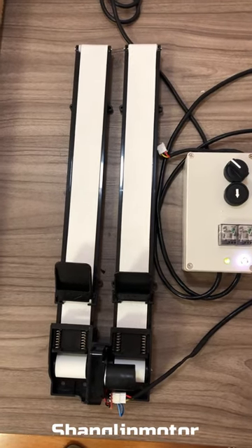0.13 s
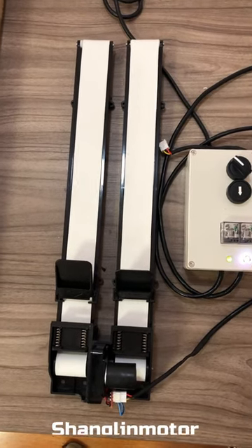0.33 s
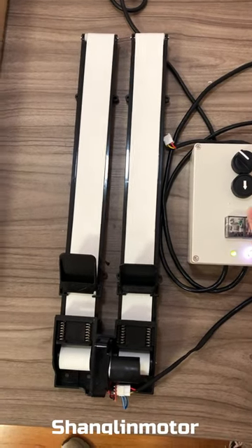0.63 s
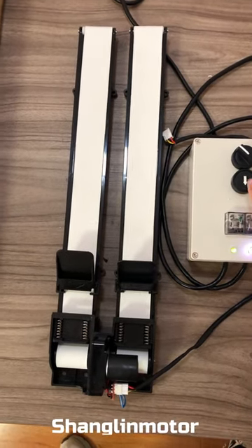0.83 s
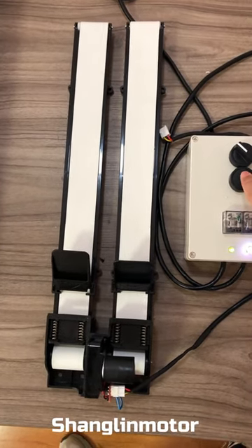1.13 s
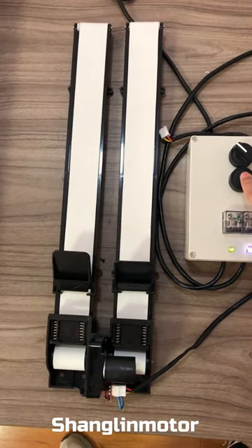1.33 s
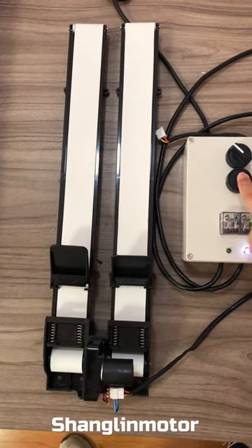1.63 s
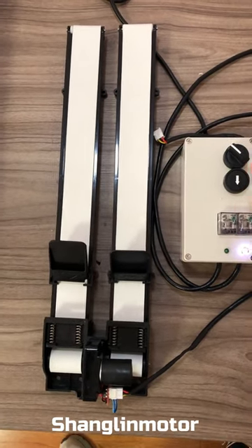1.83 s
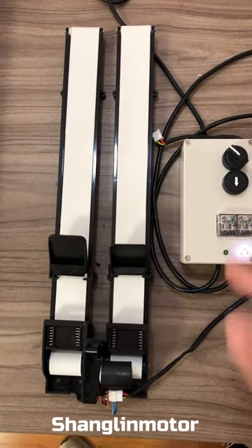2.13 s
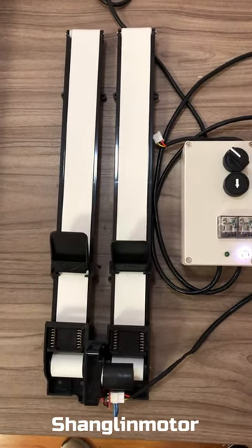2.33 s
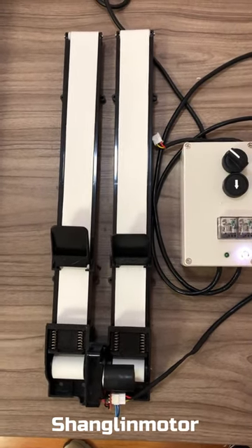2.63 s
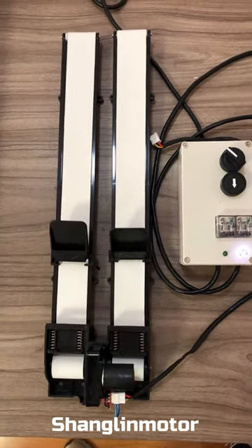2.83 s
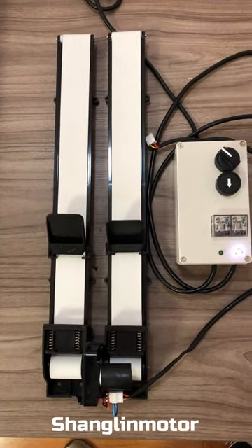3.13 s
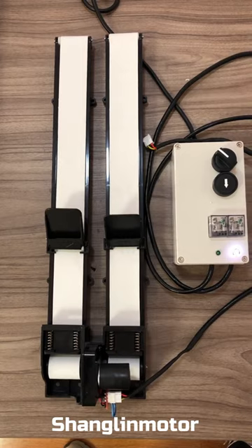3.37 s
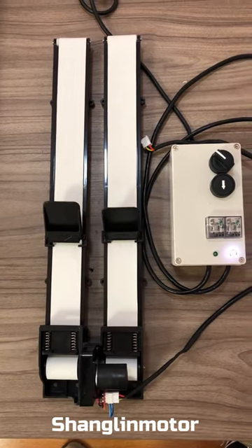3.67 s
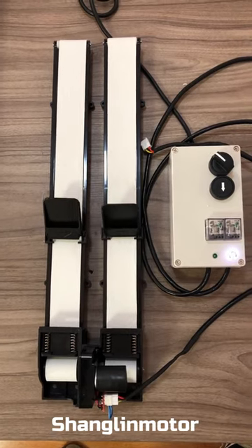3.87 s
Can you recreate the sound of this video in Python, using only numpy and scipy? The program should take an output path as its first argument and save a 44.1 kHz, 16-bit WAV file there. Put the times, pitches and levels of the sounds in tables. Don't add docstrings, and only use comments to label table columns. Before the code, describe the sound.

Quiet indoor room with a faint distant tap, then a switch snaps and a small electric gear motor whirrs at constant speed, rattly and hissy, growing fuller as the handheld microphone moves nearer until the end.

```python
import sys
import numpy as np
from scipy import signal
from scipy.fft import rfft, irfft
from scipy.io import wavfile
from scipy.ndimage import uniform_filter1d

SR = 44100
rng = np.random.default_rng(int(sys.argv[2]) if len(sys.argv) > 2 else 0)


def makeup_ratio(level_db):
    decades = np.asarray(level_db, float) / 20
    return 10 ** decades


def wrap_up_sound(samples):
    columns = np.atleast_2d(samples).T
    tamed = np.clip(columns, -1, 1)
    steps = np.round(tamed * 32767).astype(np.int16)
    wavfile.write(sys.argv[1], SR, steps)


N = 176400
T = np.arange(N) / SR
PINION, WHEEL = 11, 42


def level(x, db):
    return x * makeup_ratio(db) / np.sqrt(np.mean(x ** 2))


def band(x, hz, width):
    hz = min(hz, .45 * SR)
    return signal.lfilter(*signal.iirpeak(hz, hz / width, fs=SR), x)


def hiss(hz, width):
    return level(band(band(rng.standard_normal(N), hz, width), hz, width), 0)


def walk(rate):
    k = int(SR / rate)
    steps = np.repeat(rng.standard_normal(N // k + 1), k)
    return 1.3 * uniform_filter1d(uniform_filter1d(steps, k), k)[:N]


def curve(table, axis):
    return np.interp(T, np.array(table)[:, 0], np.array(table)[:, axis])


# [t/s, tooth rate f/Hz, whine level/dB]
TOOTH_MESH = [(1.312, 700, -63), (1.33, 1296, -41), (1.345, 1425, -25), (1.36, 1512, -26.5),
              (1.38, 1563, -33), (1.49, 1573, -30.5), (1.7, 1578, -31.5), (1.85, 1600, -31.5),
              (2.05, 1602, -34), (2.3, 1593, -25.5), (2.6, 1593, -22.5), (2.85, 1593, -25),
              (3.1, 1605, -23.5), (3.3, 1619, -26), (3.55, 1606, -28), (3.8, 1619, -26.5),
              (3.92, 1625, -26), (4.0, 1630, -21)]
# [multiple of tooth rate, level/dB far, level/dB half way, level/dB near]
MESH_OVERTONES = [(2, -41, -48, -39), (3, -41, -50, -48)]
SHAFT_ORDERS = [4.2, 5, 5.76, 7, 8, 9.73, 10, 12, 13, 16, 16.77, 6, 9, 10.5]
# [level/dB far, level/dB half way, level/dB near]
SHAFT_TONE_LEVELS = [(-58.5, -61.5, -69), (-64, -70, -52), (-67, -67.5, -49.5), (-60, -56.5, -46),
                     (-63, -45.5, -36), (-54, -50, -57), (-47, -43, -73), (-40.5, -44, -34.5),
                     (-40.5, -40.5, -45), (-49, -42, -40.5), (-79, -51, -55), (-66.5, -57.5, -59),
                     (-60, -69, -52), (-40, -40.5, -77)]


def whine(shaft, wheel, near):
    def at_distance(row):
        return np.interp(near, [0, .5, 1], row)

    jitter = .25
    swing = .3 * np.sin(wheel - 1.5) + jitter * walk(40)
    wobble = 1 + at_distance((.65, .16, .22)) * np.cos(wheel)
    size = makeup_ratio(curve(TOOTH_MESH, axis=2) + 3.5 + walk(24.82)) * wobble
    out = size * np.sin(PINION * shaft + swing)
    for k, *db in MESH_OVERTONES:
        size = makeup_ratio(at_distance(db) - 1.5 + walk(9.2))
        out = out + size * np.sin(k * (PINION * shaft + swing / 2))
    for order, db in zip(SHAFT_ORDERS, SHAFT_TONE_LEVELS):
        size = makeup_ratio(at_distance(db) + 3.5 + 1.3 * walk(15)) * (1 + .3 * np.cos(wheel - order))
        out = out + size * np.sin(order * shaft + order + jitter * walk(30))
    return out


# [f/Hz, width f/Hz, level/dB, extra level/dB when near]
FRAME_NOTES = [(1203, 190, -15.5, 12.5), (1600, 207, 1, 5), (1840, 430, -2.5, 1.8), (2418, 227, -7, 6.),
               (2790, 160, -2.5, -6), (3261, 208, -7.5, 6.5), (4094, 295, -10.5, 3.5), (4755, 306, -10, 8),
               (5770, 560, -10.5, -1), (6510, 680, -10.5, 1), (7220, 387, -6.5, .1), (8096, 640, -18, 6.5)]


def knocks(shaft, wheel, near):
    tooth = np.floor(shaft * PINION / (2 * np.pi)).astype(int)
    at = np.flatnonzero(np.diff(tooth) > 0)
    wheel_flaw = rng.standard_normal(WHEEL)[tooth[at] % WHEEL]
    pinion_flaw = rng.standard_normal(PINION)[tooth[at] % PINION]
    chance = rng.standard_normal((N // 20, 2))[:len(at)].T

    hits = 0.28 * rng.standard_normal(N) * (shaft > 0)
    strength = .12 + 1.2 * (wheel_flaw + pinion_flaw) / 2 + chance[0]
    hits[at] += strength * makeup_ratio(2 * chance[1] / 2)
    hits = hits * makeup_ratio(-np.cos(shaft) + 0.77 * walk(30.09))

    wheel_db = 6 * np.cos(wheel)
    low = hits * makeup_ratio(.3 * wheel_db)
    high = hits * makeup_ratio(wheel_db)
    ring = np.zeros(N)
    for k, (hz, width, db, near_db) in enumerate(FRAME_NOTES):
        push = low if hz < 3000 else high
        gain = (-1) ** k * makeup_ratio(db + near_db * np.minimum(2 * near, 1))
        ring += gain * band(band(push, hz, width), hz, width)
    return level(ring, -32.5)


# [f/Hz, width f/Hz, level/dB]
BRUSH_BANDS = [(9300, 1400, -55.5), (10900, 760, -56), (13270, 2800, -50), (15900, 3300, -57.5),
               (2940, 3200, -46), (700, 1300, -62.5)]


def brushes(shaft, near):
    pulse_db = 2 * np.cos(shaft) + 8 * np.cos(5 * shaft)
    db = pulse_db + 2.5 * np.minimum(2 * near, 1)
    out = sum(makeup_ratio(d + db + 0.33 * walk(15)) * hiss(hz, width) for hz, width, d in BRUSH_BANDS)
    return (shaft > 0) * out


# [f/Hz, width f/Hz, level/dB]
TABLE_HUM = [(144.9, 8.1, -63.5), (273, 27, -58)]


def table_hum():
    return sum(makeup_ratio(db + 2 * walk(4.72)) * hiss(hz, width) for hz, width, db in TABLE_HUM)


CLICK_TIMES = [1.3115, 1.3135, 1.3215, 1.612, 1.613, 1.61, 1.312, .197, .266, .275, .282, .267, .267, .444,
               .452, .472, 1.314]
# [level/dB, decay t/s, f/Hz, width f/Hz]
CLICK_SOUNDS = [(-20, 0.0021, 6500, 17400), (-17, 0.0013, 1570, 3500), (-15.5, 0.009, 1830, 270),
                (-31.5, 0.0071, 14000, 4000), (-27, 0.0057, 2600, 3500), (-39.5, .03, 230, 780),
                (-46, 0.042, 105, 120), (-39.5, 0.0023, 730, 560), (-43.5, 0.0021, 2100, 6300),
                (-55, .002, 7000, 9000), (-54, .002, 9000, 8000), (-55, 0.092, 4200, 2700),
                (-70, 0.061, 9000, 9800), (-64, .003, 9400, 6000), (-60, .003, 6300, 6000),
                (-63, .003, 8000, 6000), (-31.5, 0.012, 830, 1200)]


def clicks():
    out, age = np.zeros(N), T[:SR // 2]
    for start, (db, decay, hz, width) in zip(CLICK_TIMES, CLICK_SOUNDS):
        noise = rng.standard_normal(len(age))
        burst = level(band(band(noise, hz, width), hz, width), db)
        shape = (1 - np.exp(-age / (0.17 * decay))) * np.exp(-age / decay)
        out[int(start * SR):][:len(age)] += shape * burst
    return out


def room_echo(x):
    age = T[:SR // 2]
    tail = rng.standard_normal(len(age)) * makeup_ratio(-60 * age / .35) * (age > .004)
    return makeup_ratio(-9) * signal.fftconvolve(x, tail / np.sqrt(np.sum(tail ** 2)))[:N]


# [f/Hz, level/dB per Hz]
AIR_COLOUR = [(28, -36), (64, -14), (156, -4), (450, -9.5), (1500, -14.5), (3000, -28.5), (9000, -38.5),
              (15500, -41)]


def room_air():
    hz = np.maximum(np.arange(N // 2 + 1) * SR / N, 1)
    colour = np.array(AIR_COLOUR)
    shape = makeup_ratio(np.interp(np.log(hz), np.log(colour[:, 0]), colour[:, 1]))
    air = irfft(rfft(rng.standard_normal(N)) * shape, N)
    return level(air, -54) * makeup_ratio(1.4 * walk(8.2))


# [f/Hz, width f/Hz, level/dB]
BUILDING_HUM = [(63, 12, -64), (82.5, 6.6, -63.5), (122.2, 7.8, -63.5), (148, 39, -59.5), (267.6, 62, -66),
                (13600, 1900, -80)]


def building_hum():
    return sum(makeup_ratio(db + (hz < 500) * 2 * walk(4.98)) * hiss(hz, width) for hz, width, db in BUILDING_HUM)


# [t/s, nearness 0-1]
NEARNESS = [
    (1.3, 0.),
    (1.65, .05),
    (1.9, .3),
    (2.15, .35),
    (2.35, .5),
    (2.95, .55),
    (3.2, .85),
    (3.7, 1.),
    (4.0, .95),
]


def scene():
    since_on = T - CLICK_TIMES[0]
    shaft_hz = curve(TOOTH_MESH, axis=1) / PINION * (since_on > 0) * (1 + .001 * walk(20))
    shaft = 2 * np.pi * np.cumsum(shaft_hz) / SR
    wheel = shaft * PINION / WHEEL + 2 * np.pi * 0.49
    near = curve(NEARNESS, axis=1)

    settle = np.clip(since_on / .03, 0, 1) ** 2
    tone = settle * (whine(shaft, wheel, near) + table_hum())
    rise = 1 - np.exp(-np.maximum(since_on, 0) / 0.027)
    rattle = rise * (knocks(shaft, wheel, near) + brushes(shaft, near)) + clicks()
    echo = room_echo(rattle + makeup_ratio(-10) * tone)
    return (tone + rattle + echo + room_air() + building_hum())[None]


def band_limit(x):
    return signal.sosfilt(signal.butter(12, 16890, fs=SR, output="sos"), x)


def record(dry):
    top_cut = signal.ellip(12, .2, 70, 15730, fs=SR, output="sos")
    mix = signal.sosfilt(top_cut, dry)
    return band_limit(mix)


dry = scene()
out = record(dry)
wrap_up_sound(out)
```